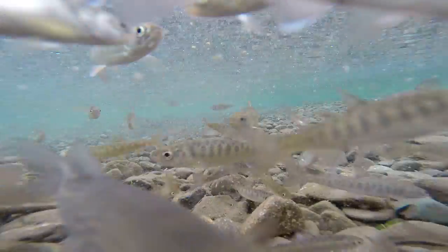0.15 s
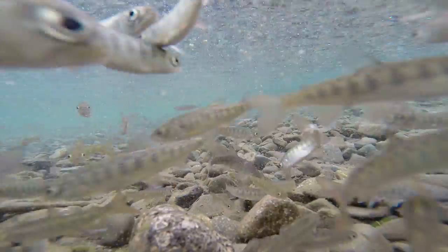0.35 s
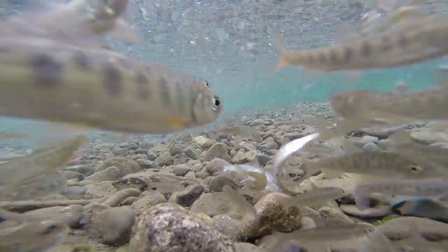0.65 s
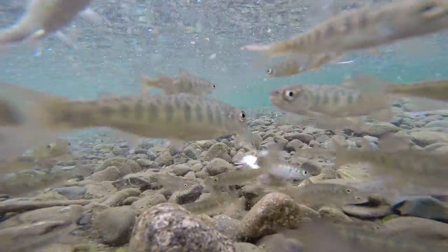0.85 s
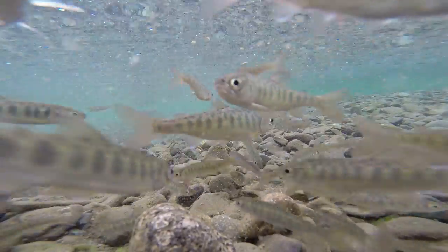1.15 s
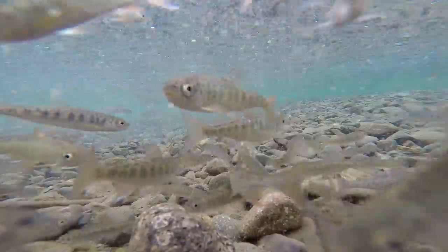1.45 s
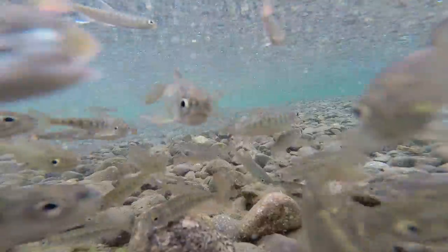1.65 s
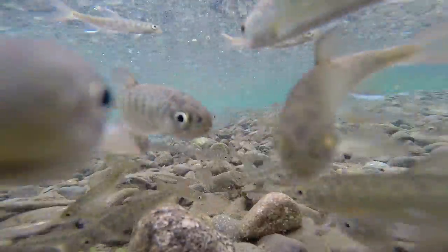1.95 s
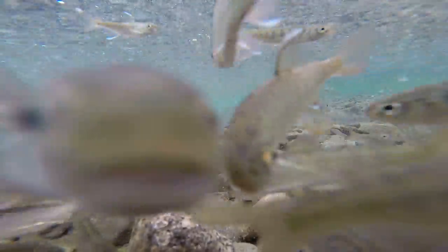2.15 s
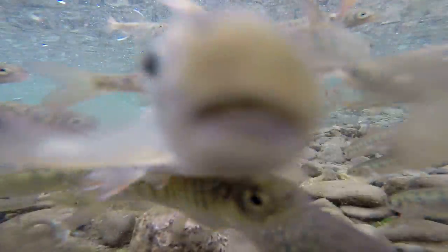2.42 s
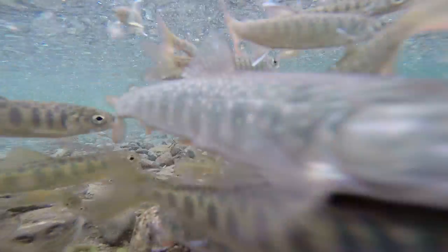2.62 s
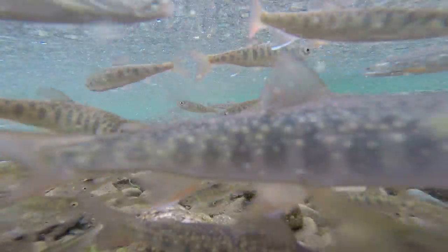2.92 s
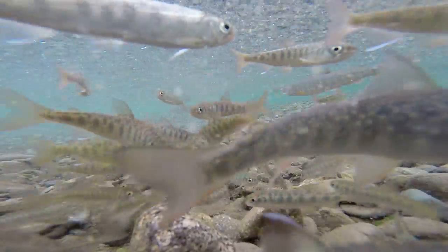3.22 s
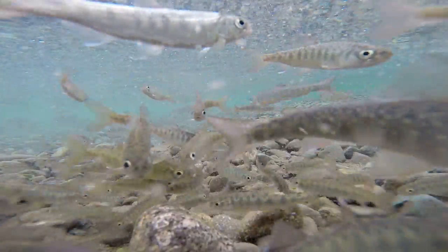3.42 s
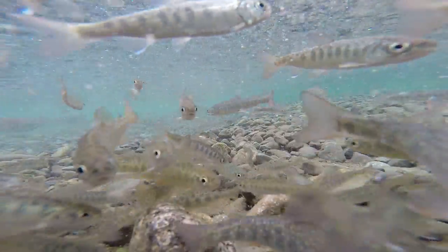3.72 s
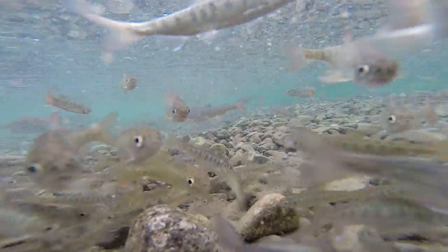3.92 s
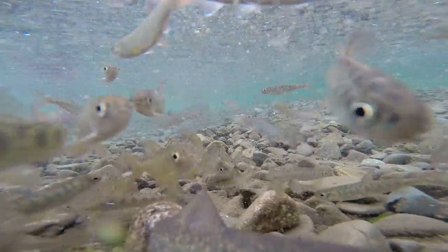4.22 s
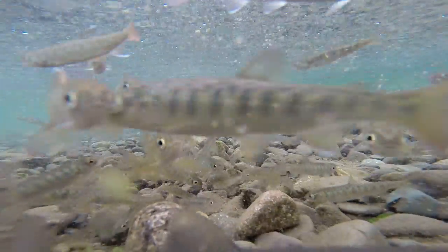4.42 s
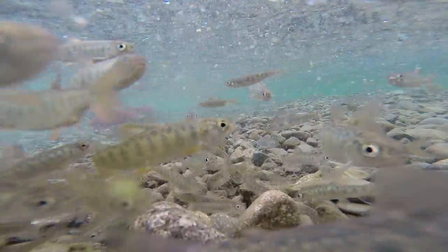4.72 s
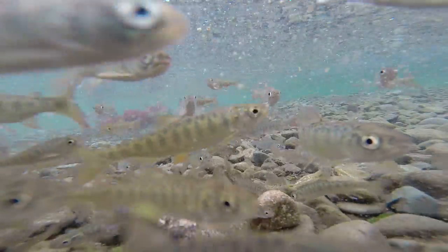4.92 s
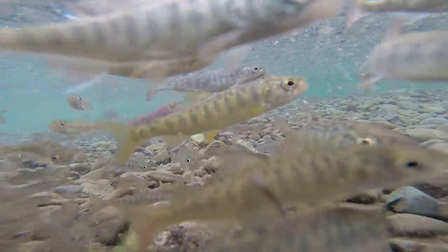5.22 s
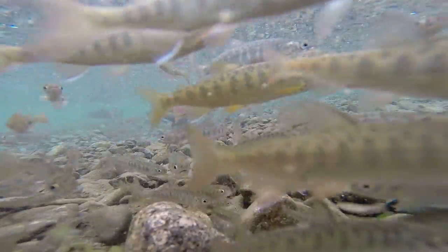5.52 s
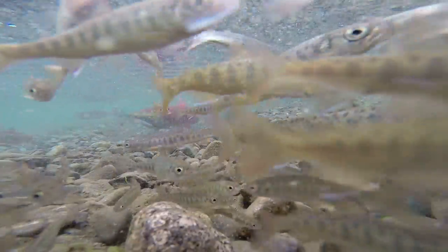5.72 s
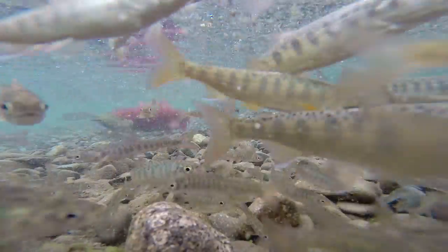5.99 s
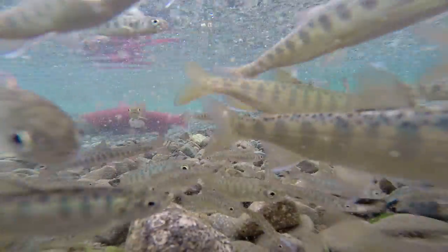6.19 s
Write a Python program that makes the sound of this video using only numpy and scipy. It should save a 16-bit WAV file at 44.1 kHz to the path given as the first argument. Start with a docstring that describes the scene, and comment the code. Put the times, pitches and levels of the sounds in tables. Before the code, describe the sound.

Very close, muffled contact sounds picked up by a camera lying underwater among stones. A crackling knock comes almost at once, a small one later, then stronger double bumps with clicking and rubbing, and finally the loudest, distorted knock with scraping and clatter. Between them lie a low, soft river hush, faint high whine, weak ticking circuit noise and occasional soft bubble blips. The last two seconds are calm.

```python
"""A gravel river bed: a small camera in a plastic housing rests there while fish crowd round and nudge it.
Under it all lie the hush of the river, made of shaped noise, and the camera's own faint whine and chatter.
Each nudge is a dull smooth push that rocks the housing on the stones.
Fins and grit tick and scrape on its walls: snaps and noise that make the walls ring.
A few bubbles blip as short sine waves; late on, a hard knock overloads the recorder with a bright hiss."""
import sys
import numpy as np
from scipy import signal
from scipy.fft import rfft, irfft
from scipy.io import wavfile
from scipy.ndimage import uniform_filter1d

SR = 44100
rng = np.random.default_rng(int(sys.argv[2]) if len(sys.argv) > 2 else 0)


def ratio_of_db(decibels):
    """Turn decibels (scalar or array-like) into linear amplitude factors; 0 dB maps to 1."""
    return 10 ** (np.asarray(decibels, float) / 20)


def generate_wav(sig):
    """Save sig (samples, or channels by samples) to the path in sys.argv[1] as 16-bit PCM at SR."""
    pcm = np.round(np.clip(np.atleast_2d(sig).T, -1, 1) * 32767).astype(np.int16)
    wavfile.write(sys.argv[1], SR, pcm)


N = 280026

# what the housing walls ring with, group by group from low to high: pitch_hz, width_hz, level_db
WALLS = [(595, 170, -5.5), (804, 150, 2.5), (1020, 230, -7.5), (1265, 210, 1.5), (1644, 200, -4.5)]
WALL_BRIGHT = [(1910, 220, 5.5), (2560, 480, -1.5), (3200, 320, -3), (3485, 480, -4)]
WALL_TREBLE = [(4700, 670, -2), (5584, 580, 2.5), (7040, 1200, -4.5), (8600, 1600, -9.5)]
WALL_TOP = [(10230, 670, -4.5), (12500, 1800, -11), (14130, 1500, -15.5)]


def rms_one(x):
    """Scale to unit rms."""
    return x / np.sqrt(np.mean(x ** 2) + 1e-18)


def add(out, start_s, piece):
    """Mix a piece in from a given time on."""
    i = max(int(start_s * SR), 0)
    out[i:i + len(piece)] += piece[:N - i]


def resonate(x, bands):
    """Sum of two-pole resonances, signs alternating so the valleys between them stay open."""
    total = 0
    for k, (hz, width_hz, db) in enumerate(bands):
        b, a = signal.iirpeak(hz, hz / width_hz, fs=SR)
        total = total + (-1) ** k * ratio_of_db(db) * signal.lfilter(b, a, x)
    return total


def steep(x, bands):
    """Each resonance applied twice, so little leaks outside the group."""
    total = 0
    for k, (hz, width_hz, db) in enumerate(bands):
        wide_hz = 1.63 * width_hz  # two passes narrow a resonance, so each one is wider
        once = resonate(x, [(hz, wide_hz, 0)])
        total = total + (-1) ** k * resonate(once, [(hz, wide_hz, db)])
    return total


def grit(shape, spread_db):
    """Noise whose grains have a long tail of sizes."""
    return rng.standard_normal(shape) * ratio_of_db(spread_db * rng.exponential(size=shape))


def river():
    """A smooth hush, noise shaped by pitch; its bass heaves a little with the current."""
    # colour of the hush: pitch_hz, level_db (relative, per Hz)
    colour = [(15, -30.5), (25, -2.5), (191, -6.5), (309, -9), (383, -9), (438, -9), (515, -9.5),
              (588, -11.5), (3010, -20.5), (5280, -25.5), (5880, -25.5), (9270, -33), (15000, -35.5)]
    level_db, heave_db = -58.5, 2.8  # rms of the whole river; typical swing of its bass
    hz, db = np.transpose(colour)
    f = np.fft.rfftfreq(N, 1 / SR) + 1
    hush = rfft(rng.standard_normal(N)) * ratio_of_db(np.interp(np.log(f), np.log(hz), db))
    bass = 1 / (1 + (f / 160) ** 2)  # the share of each pitch that heaves
    steps = np.repeat(rng.standard_normal(N // 4000 + 1), 4000)[:N]
    heave = rms_one(uniform_filter1d(steps, size=4000))
    steady_part = irfft(hush * (1 - bass), N)
    heaving_part = ratio_of_db(heave_db * heave) * irfft(hush * bass, N)
    return ratio_of_db(level_db) * rms_one(steady_part + heaving_part)


def train(start_s, length_s, rate, db, stumble_db):
    """Times and size of a train of tiny pulses; the gaps between them stumble by a few dB."""
    gaps_s = ratio_of_db(stumble_db * rng.standard_normal(128)) / rate
    at_s = start_s + np.cumsum(gaps_s)
    at = (at_s[at_s < start_s + length_s] * SR).astype(int)
    return at, ratio_of_db(db) * np.sqrt(SR / rate)


def circuits():
    """Thin whines with a wavering phase, and trains of tiny pulses while the camera is busy."""
    # steady whines: pitch_hz, level_db (rms)
    whines = [(2939, -81), (5846, -77.5), (5873, -83.5), (8780, -83), (11687, -89), (11719, -82.5),
              (14626, -82)]
    # what the pulses ring: pitch_hz, width_hz, level_db
    chatter_bands = [(7060, 630, 6.5), (10340, 1600, 4), (13500, 2000, -24.5)]
    # long spells of work, each ending in a fast buzz: start_s, length_s
    busy_spells = [(0, 0.25), (1.985, 0.22), (4.248, .26)]
    # in between, blips come in runs: first_s, last_s
    blip_runs = [(.63, 1.6), (2.89, 3.85), (4.61, 5.95)]
    # rates in pulses per s; levels are those of the pulses before they ring
    busy_rate, busy_db = 210, -74.5
    buzz_s, buzz_rate, buzz_db = .04, 800, -70
    blip_every_s, blip_jitter_s, blip_s, blip_rate, blip_db = .147, .012, .048, 78, -80.5

    t = np.arange(N) / SR
    whine = np.zeros(N)
    for hz, db in whines:
        waver = np.cumsum(rng.standard_normal(N)) * 0.013
        whine += np.sqrt(2) * ratio_of_db(db) * np.sin(2 * np.pi * hz * t + waver)
    trains = []
    for start_s, length_s in busy_spells:
        trains.append(train(start_s, length_s, busy_rate, busy_db, 4.9))
        trains.append(train(start_s + length_s, buzz_s, buzz_rate, buzz_db, 0))  # the buzz keeps time
    for first_s, last_s in blip_runs:
        for start_s in np.arange(first_s, last_s, blip_every_s):
            late, loud = rng.standard_normal(size=2)
            trains.append(train(start_s + blip_jitter_s * late, blip_s, blip_rate, blip_db + 1.5 * loud, 2.3))
    pulses = np.zeros(N)
    for at, size in trains:
        np.add.at(pulses, at, size)
    return whine + ratio_of_db(6) * steep(pulses, chatter_bands)


def ticks():
    """A crack amid a few ms of grit; harder contacts ring the higher wall modes more, and these stop sooner."""
    # ticks on the walls: start_s, level_db (peak of the lowest group), # bright_db and treble_db (peaks of the
    # higher groups, relative to level_db); # the last row is a faint tick from the camera's own circuits, rung
    # through the same modes
    tick_list = [(0.143, -47, -6, -21), (0.2026, -52, -18, -6), (0.2513, -42.5, -12, -10),
                 (0.2843, -40, -15.5, -16), (0.3126, -21.5, -7.5, -25), (0.3187, -29.5, 10.5, -4),
                 (.3372, -42.5, -7.5, 1), (0.343, -27.5, 0.5, -38), (0.356, -29, 3, -24),
                 (0.3623, -31, -4, -21.5), (.3952, -34, 1, -17), (0.404, -27.5, 8.5, -12),
                 (0.4199, -36, -3, -21), (.448, -38.5, 13, -14), (0.4598, -40, 10, -9),
                 (0.4664, -18.5, 9.5, -8), (0.477, -36, 11, -14), (0.482, -36.5, 10.5, 4),
                 (.498, -37, 3, -22), (0.509, -44, -7, -5), (0.5269, -31, 5, -7), (1.3719, -35, -16, -20),
                 (1.3807, -21.5, -16.5, -19.5), (1.3845, -32, -24, -32), (1.4017, -38, -4, -11),
                 (1.488, -49, -3.5, -15.5), (1.9778, -29, -7.5, -13), (2.2684, -18, -11.5, -30.5),
                 (2.2762, -23, -15, -18), (2.2796, -20, -9.5, -13.5), (2.293, -41, -6, -16.5),
                 (2.2967, -30, -3, -13.5), (2.3021, -30, -1, -8.5), (2.3216, -43, 2, -22),
                 (2.3476, -36.5, 2.5, -1), (2.351, -40, -10, -2), (2.364, -40, 1, -7), (2.4446, -44, 3, 0),
                 (2.46, -30.5, -3, -27), (2.4693, -30.5, -8, -18), (2.478, -37, -5, -18),
                 (2.5175, -36.5, -4, -15), (2.5412, -44, 1, -21), (2.6255, -34, -3, -13.5),
                 (2.6307, -33, -7, -14), (2.6787, -37, -4, -17), (2.7276, -30, -0.5, -11),
                 (2.733, -34.5, -8.5, -8), (4.0068, -22.5, -12.5, -33), (4.0273, -20.5, -14.5, -19.5),
                 (4.032, -27, -6, -27), (4.0442, -23, -9.5, -9.5), (4.0523, -10, -19, -28),
                 (4.0557, -6, -23.5, -41), (4.0608, -29, -17, -29), (4.0691, -24, -8, -7.5),
                 (4.096, -45, 9, -13), (4.1096, -37, -4, -12), (4.1425, -32.5, -17, -31),
                 (4.1489, -39, 4.5, -12), (4.1729, -29, -11, -17), (4.1836, -30.5, -1, -10.5),
                 (4.2057, -24.5, -17, -23), (4.2132, -24.5, -19, -17.5), (4.2375, -28, -15, -17),
                 (4.2498, -30, -14, -13), (4.2704, -30, 0, -10), (4.3046, -38, -20, -16),
                 (4.3117, -28.5, 4.5, -10.5), (4.3162, -22.5, -18, -25), (4.408, -57, 1, 18)]
    fade_ms, top_db = 2.1, -14.5  # the top modes lie this far under the treble modes
    crack_db, crack_ms = 19.5, .5  # the first snap: its size, and how soon it comes
    out, t_ms = np.zeros(N), np.arange(2048) * 1000 / SR
    crack = np.zeros(2048)
    crack[int(crack_ms * SR / 1000)] = ratio_of_db(crack_db)
    for start_s, level_db, bright_db, treble_db in tick_list:
        grains = grit(2048, 1.4)
        # wall modes, share of the fade time, level in dB
        groups = ((WALLS, 1.0, 0), (WALL_BRIGHT, .75, bright_db),
                  (WALL_TREBLE, .65, treble_db), (WALL_TOP, .65, treble_db + top_db))
        for bands, brief, share_db in groups:
            u = t_ms / (brief * fade_ms)
            ring = steep(crack + grains * u ** 0.95 * np.exp(-u), bands)
            add(out, start_s, ratio_of_db(level_db + share_db) * ring / np.abs(ring).max())
    return out


def nudges():
    """Each nudge is one smooth push, and the housing goes on rocking on the stones."""
    # nudges: peak_s, push_db, direction (sign), contact_ms
    nudge_list = [(.144, -30.5, -1, 1.15), (.166, -28, -1, 19.6), (.204, -27.5, 1, 1.7),
                  (.253, -27.5, -1, 4.1), (0.2873, -18, -1, 3.25), (.3108, -13.5, -1, 2.7),
                  (.3139, 2.5, -1, 4.83), (0.3386, -6, -1, 3.8), (0.368, -24, -1, 6), (.404, -26, 1, 2.8),
                  (0.525, -18.5, 1, 3.27), (1.28, -58, 1, 32), (1.3776, -20.5, 1, 2.6),
                  (1.39, -29, -1, 7.4), (1.406, -37, -1, 6.1), (1.978, -26, -1, 0.94),
                  (1.9818, -10, -1, 2.5), (1.989, -25.5, -1, 3.1), (1.9955, -29.5, -1, 2.4),
                  (2.001, -27, -1, 2.5), (2.0153, -27.5, -1, 4.3), (2.029, -34, -1, 3.6),
                  (2.13, -34, -1, 4.1), (2.215, -39.5, 1, 1.3), (2.27, -4, -1, 2.4), (2.272, 3, -1, 3.96),
                  (2.2807, -12, -1, 5), (2.352, -20.5, -1, 5.4), (2.4286, -25, -1, 7.6),
                  (2.491, -28.5, 1, 7.6), (2.726, -21, 1, 3.6), (2.75, -38, 1, 7.4), (3.78, -51, -1, 11),
                  (3.837, -60, -1, 6.5), (4.0087, -8.5, -1, 2), (4.0107, 3.5, -1, 3.8),
                  (4.019, -6.5, -1, 6.1), (4.0215, -2, 1, 1.35), (4.025, -9, -1, 3.2),
                  (4.047, -12.5, -1, 12), (4.067, -10.5, 1, 2.9), (4.073, -16, -1, 5.6),
                  (4.107, -30, -1, 11), (4.182, -25.5, -1, 4.7), (4.2689, -18.5, -1, 4.9),
                  (4.298, -32, -1, 5.6), (4.306, -11, 1, 1.87), (4.3184, -11.5, -1, 3.4),
                  (4.323, -20, -1, 2.5)]
    # the housing rocking on the stones: pitch_hz, t60_s (time to fade by 60 dB), level_db
    rocking_modes = [(31.08, 0.46, 0.5), (47.2, 0.34, 0), (70, 0.22, -5.5)]
    # wedged between stones, it rocks little more for a hard push than for a soft one;
    # a longer contact rocks it more
    rock_db, rock_per_push, rock_per_length = -38, 0.34, 0.41
    push, jolt = np.zeros(N), np.zeros(N)
    for peak_s, push_db, way, ms in nudge_list:
        bump = np.sign(way) * np.hanning(int(ms * SR / 1000) + 3)
        start_s = peak_s - ms / 2000
        add(push, start_s, ratio_of_db(push_db) * bump)
        strength = ratio_of_db(rock_db + rock_per_push * push_db) * ms ** rock_per_length
        add(jolt, start_s, strength * bump / np.abs(bump).sum())
    t = np.arange(SR) / SR
    ring = np.zeros(SR)
    for hz, t60_s, db in rocking_modes:
        ring += ratio_of_db(db) * np.sin(2 * np.pi * hz * t) * np.exp(-np.log(1000) * t / t60_s)
    return push, -signal.fftconvolve(jolt, ring)[:N]


def thuds(push):
    """The recorder's high-pass makes each push swing back, and the hollow housing booms briefly."""
    # hollow of the housing: pitch_hz, width_hz, level_db
    boom_modes = [(118, 65, -6), (330, 260, -13.5)]
    low_cut_hz, low_cut_q = 42, 0.52
    w = 2 * np.pi * low_cut_hz
    b, a = signal.bilinear([1, 0, 0], [1, w / low_cut_q, w * w], SR)
    return signal.lfilter(b, a, push) + sum(resonate(push, [mode]) for mode in boom_modes)


def rubs(push):
    """Skin and grit drag over the walls in short slips; loose grains snap, and each nudge grinds on briefly."""
    # strokes along the walls, each a list of points: time_s, level_db, grittiness_db
    strokes = [
        [(.305, -46, -12), (.32, -34.5, -1), (.365, -47, -6), (.385, -49, 0), (.43, -47.5, 0.5),
         (.48, -38.5, -14), (.53, -56, 9), (.562, -55, -20)],
        [(1.372, -55, -3), (1.39, -53, 3), (1.43, -72, -5)],
        [(1.978, -49, 3), (1.995, -57, -11), (2.08, -70, -6)],
        [(2.266, -32, -21), (2.275, -33, -11), (2.305, -32, -5), (2.34, -41, -9), (2.375, -54.5, -17)],
        [(2.375, -60, -8), (2.47, -45.5, -0.5), (2.5, -57, -7), (2.53, -52.5, -16), (2.56, -71, -10)],
        [(2.62, -70, 7), (2.635, -57, 0), (2.66, -60.5, -9), (2.74, -43, 0), (2.76, -60, -8), (2.785, -63, -5)],
        [(4.006, -50, 0), (4.03, -29.5, -4), (4.065, -27, -10.5), (4.082, -42, -2.5), (4.11, -53, -8)],
        [(4.11, -55, -5), (4.165, -51, -3), (4.24, -37, -6.5), (4.29, -48.5, -6), (4.31, -37, 2),
         (4.33, -46.5, -15), (4.35, -71, -1)],
    ]
    # the lowest wall modes: pitch_hz, width_hz, level_db
    wall_bass = [(160, 83, 1), (260, 110, -10.5), (410, 110, -5)]
    # grittier strokes ring the higher wall modes more
    bass_db, treble_db, treble_per_grit, edge_ms = -1.5, -15.5, .9, 3
    grind_db, grind_fade_s = -12, .015  # a nudge grinds the housing into the stones
    snaps_per_s, snap_db = 310, -3.5  # loose grains that snap during a stroke

    steps = np.repeat(ratio_of_db(4.0 * rng.standard_normal(N // 100 + 1)), 100)[:N]
    slips = uniform_filter1d(steps, size=40)
    drag = rms_one(grit(N, 1.2) * slips)
    is_snap = rng.random(N) < snaps_per_s / SR
    snaps = ratio_of_db(snap_db) * grit(N, 2.7) * is_snap * np.sqrt(SR / snaps_per_s)
    rumble = rms_one(steep(drag, wall_bass))
    body = rms_one(steep(drag, WALLS))
    bright = rms_one(steep(drag + snaps, WALL_BRIGHT))
    treble = rms_one(steep(drag + snaps, WALL_TREBLE + WALL_TOP[:1]))

    keep = np.exp(-1 / (grind_fade_s * SR))
    grind = signal.lfilter([1 - keep], [1, -keep], np.abs(push))  # follows the push and fades after it
    out = ratio_of_db(grind_db) * grind * rumble
    t = np.arange(N) / SR
    for stroke in strokes:
        time_s, level_db, grit_db = np.transpose(stroke)
        gritty_db = np.interp(t, time_s, grit_db)
        high = ratio_of_db(gritty_db) * bright + ratio_of_db(treble_db + treble_per_grit * gritty_db) * treble
        edges = np.clip(np.minimum(t - time_s[0], time_s[-1] - t) * 1000 / edge_ms, 0, 1)
        level = edges * ratio_of_db(np.interp(t, time_s, level_db))
        out += level * (ratio_of_db(bass_db) * rumble + body + high)
    return out


def bubbles():
    """Each bubble is a few cycles of a sine that swell, fade and glide up."""
    # bubbles: start_s, level_db (peak), pitch_hz (at the start), half_length (in cycles)
    bubble_list = [(.797, -41.5, 420, 0.86), (.805, -43, 473, 1.9), (0.922, -42.5, 415, 2.16),
                   (1.59, -47.5, 480, 3.5), (2.79, -46, 480, 3)]
    out = np.zeros(N)
    for start_s, db, hz, cycles in bubble_list:
        u = np.linspace(0, 1, int(2 * cycles * SR / hz))  # 0 to 1 over the whole bubble
        swell = np.sin(np.pi * u ** 0.83) ** 2
        add(out, start_s, ratio_of_db(db) * swell * np.sin(4 * np.pi * cycles * u * (1 + 0.025 * u)))
    return out


def overload_hiss():
    """A few ms of bright hiss as the hardest knock overloads the recorder: noise in two treble groups."""
    start_s, rise_ms, fade_ms, treble_db, top_db = 4.018, 0.395, 4.2, -29, -26.5  # levels are peaks
    out, t_ms = np.zeros(N), np.arange(1024) * 1000 / SR
    burst = rng.standard_normal(1024) * np.clip(t_ms / rise_ms, 0, 1) * np.exp(-(t_ms / fade_ms) ** 3)
    # the hiss borrows its pitches from the wall modes
    for bands, db in ((WALL_TREBLE, treble_db), (WALL_TOP, top_db)):
        hiss = steep(burst, bands)
        add(out, start_s, ratio_of_db(db) * hiss / np.abs(hiss).max())
    return out


def scene():
    """The sum of all that the one microphone picks up, with the hiss of the overload."""
    push, rocking = nudges()
    knocks = thuds(push) + rocking + overload_hiss()
    contacts = ticks() + rubs(push)
    return (river() + circuits() + knocks + contacts + bubbles())[None]


def roll_off(x):
    """The treble ends steeply here."""
    return signal.sosfilt(signal.butter(12, 16190, fs=SR, output="sos"), x)


def record(dry):
    """Peaks beyond full scale clip, and a steep low-pass cuts the top."""
    top_hz = 14900
    clipped = np.clip(dry, -1, 1)
    low_pass = signal.ellip(8, .2, 60, top_hz, fs=SR, output="sos")
    mix = signal.sosfilt(low_pass, clipped)
    return roll_off(mix)


dry = scene()
out = record(dry)
generate_wav(out)
```